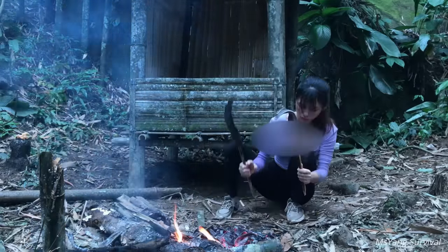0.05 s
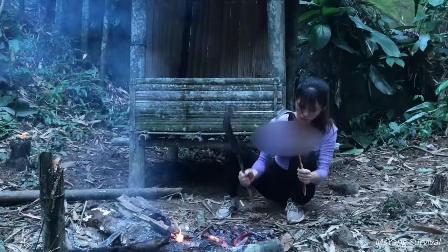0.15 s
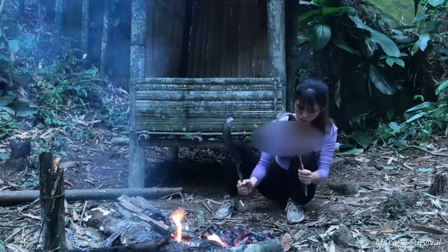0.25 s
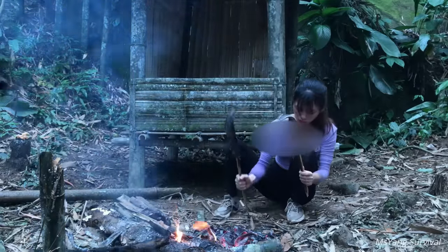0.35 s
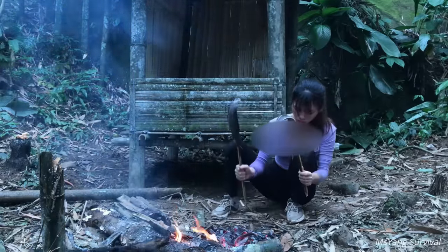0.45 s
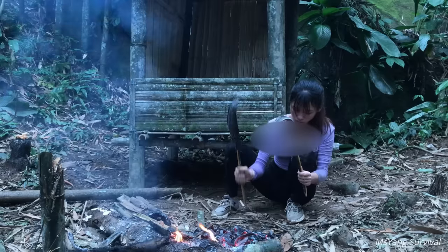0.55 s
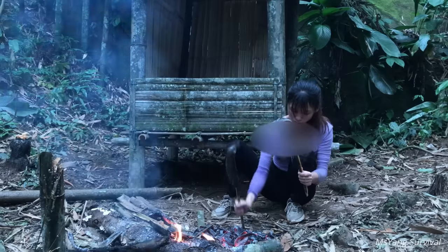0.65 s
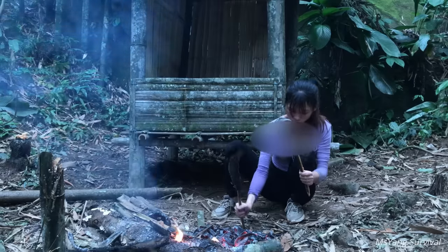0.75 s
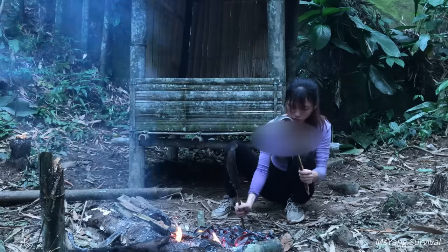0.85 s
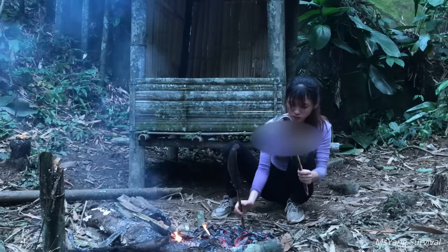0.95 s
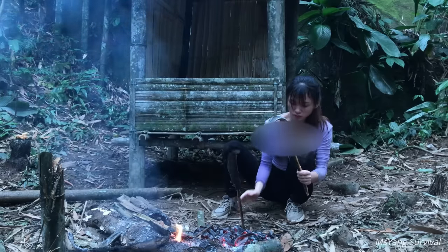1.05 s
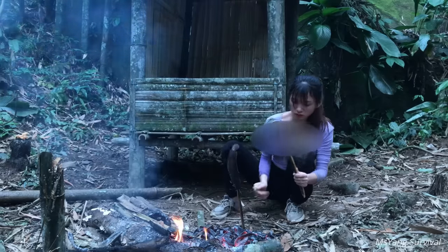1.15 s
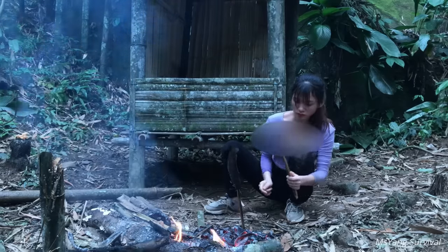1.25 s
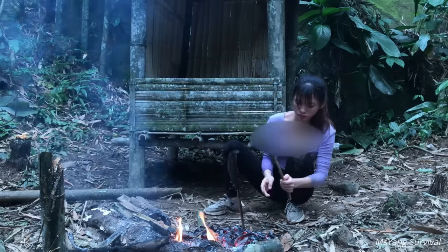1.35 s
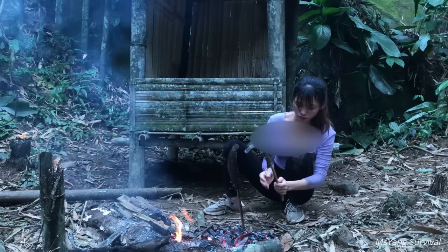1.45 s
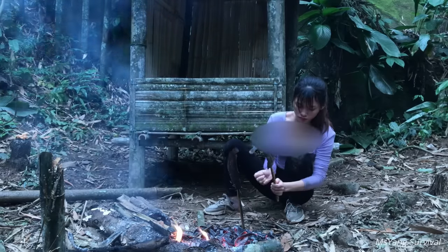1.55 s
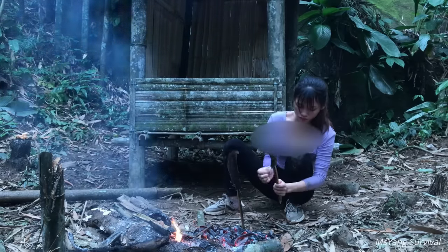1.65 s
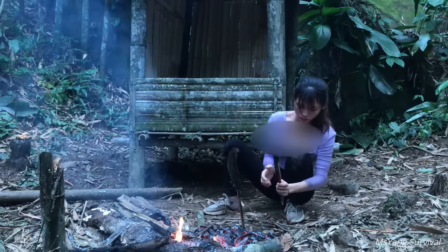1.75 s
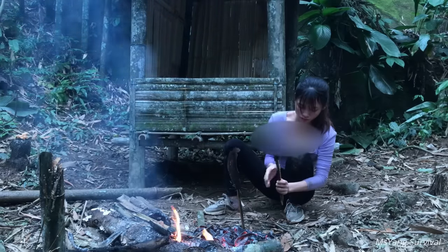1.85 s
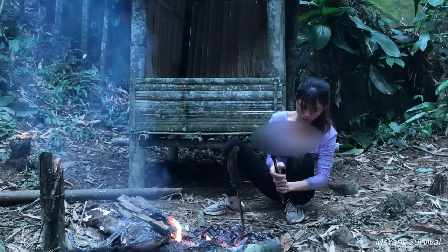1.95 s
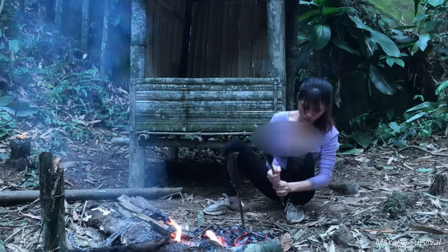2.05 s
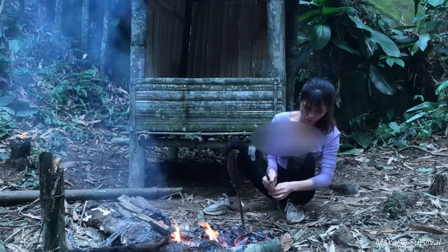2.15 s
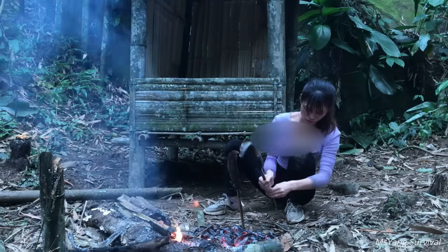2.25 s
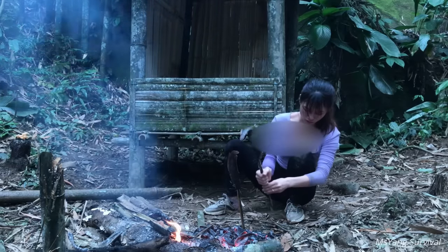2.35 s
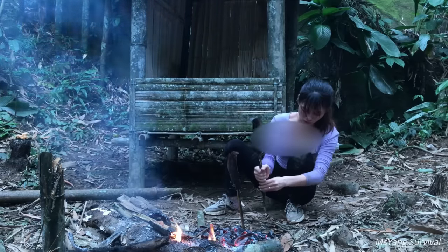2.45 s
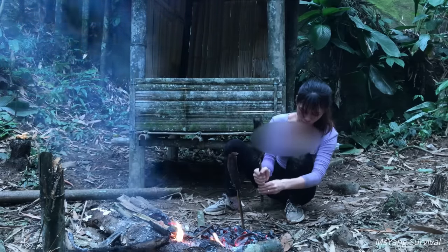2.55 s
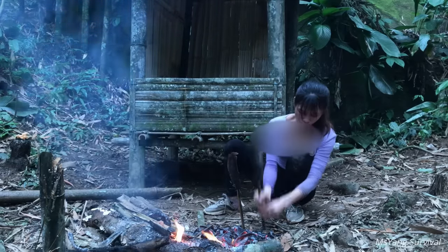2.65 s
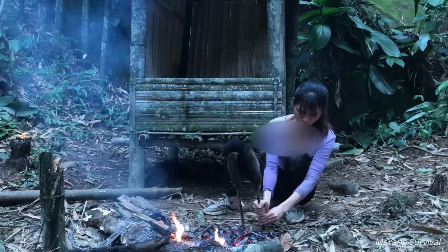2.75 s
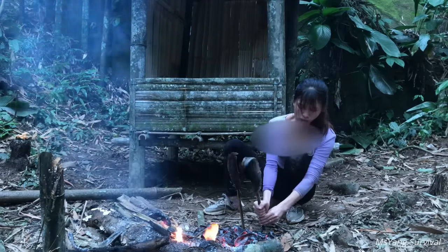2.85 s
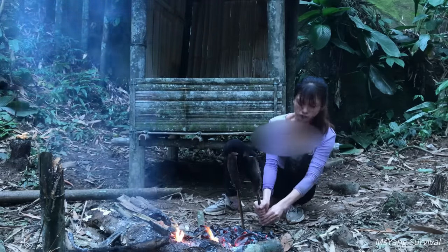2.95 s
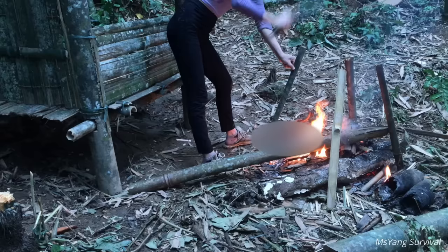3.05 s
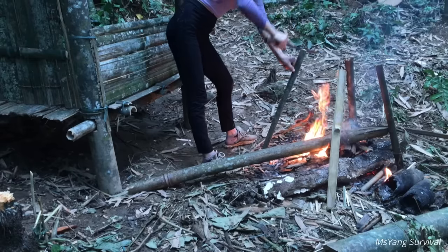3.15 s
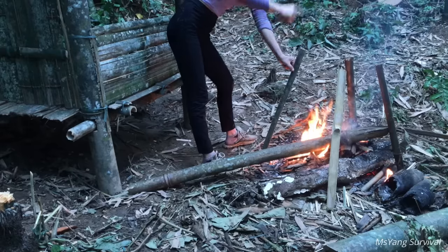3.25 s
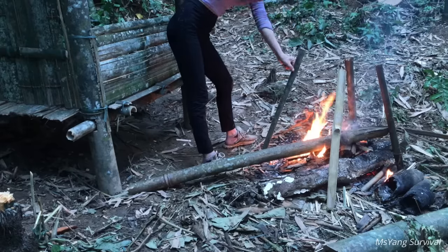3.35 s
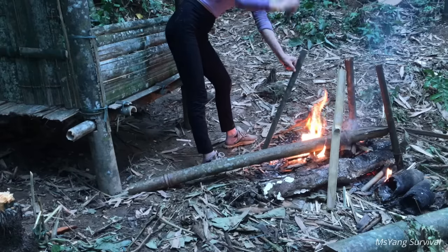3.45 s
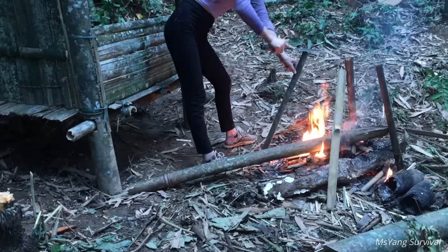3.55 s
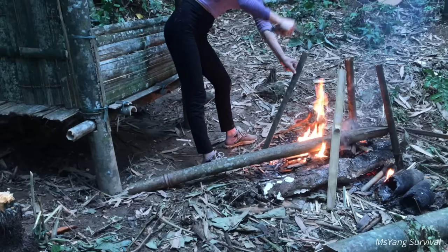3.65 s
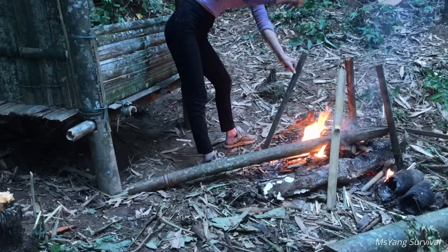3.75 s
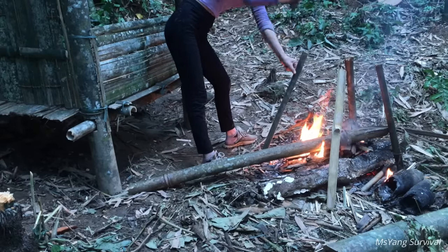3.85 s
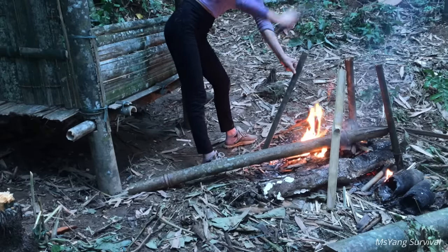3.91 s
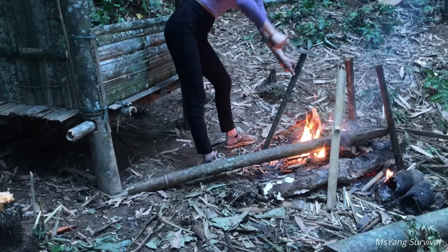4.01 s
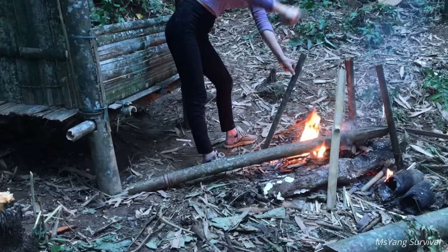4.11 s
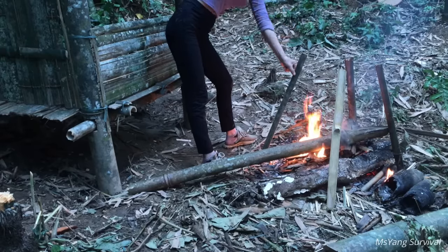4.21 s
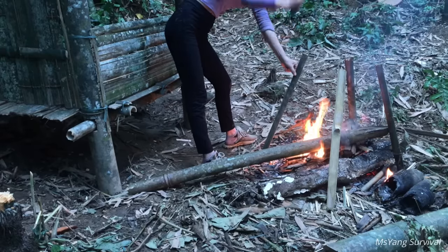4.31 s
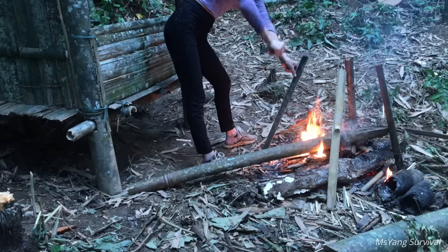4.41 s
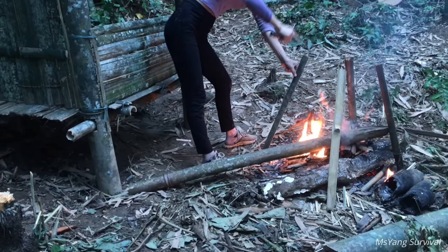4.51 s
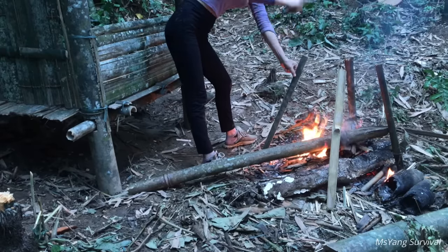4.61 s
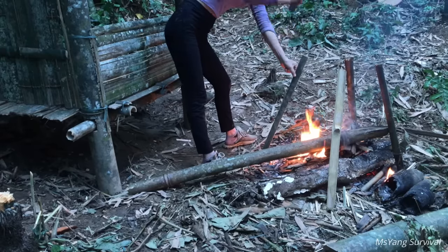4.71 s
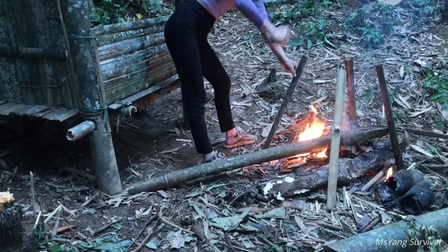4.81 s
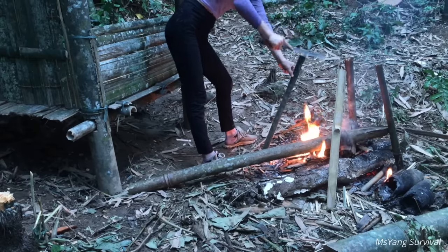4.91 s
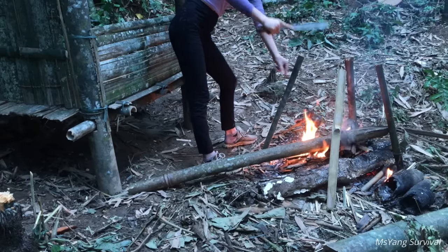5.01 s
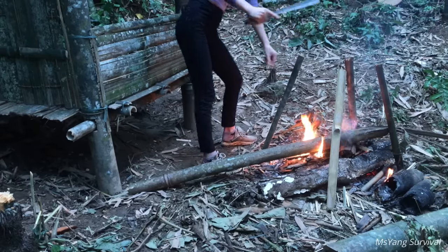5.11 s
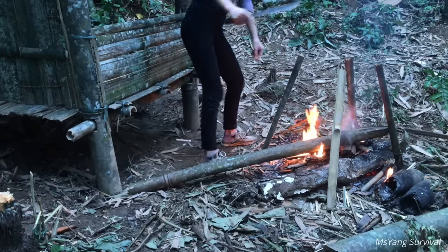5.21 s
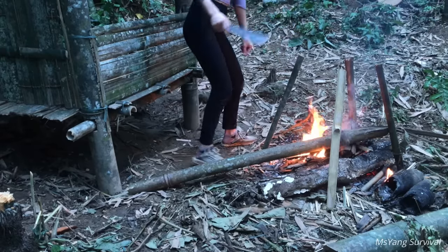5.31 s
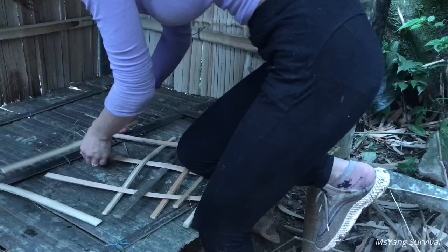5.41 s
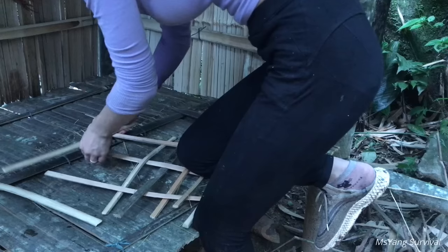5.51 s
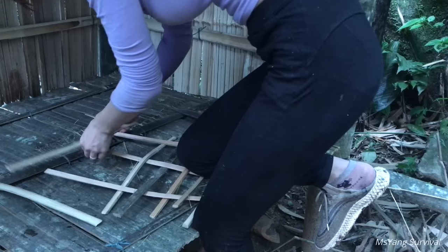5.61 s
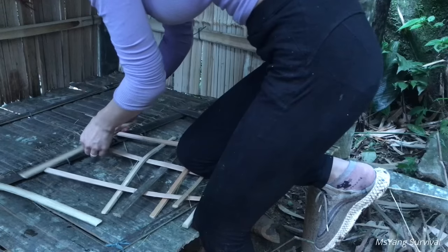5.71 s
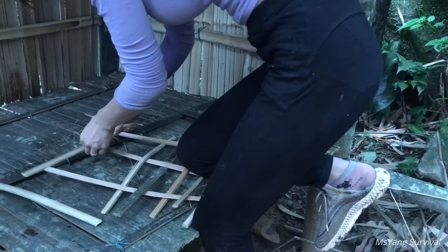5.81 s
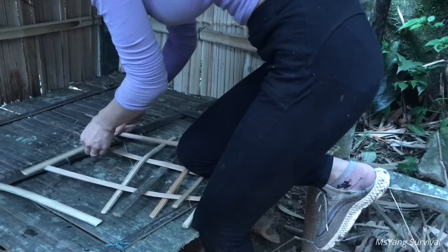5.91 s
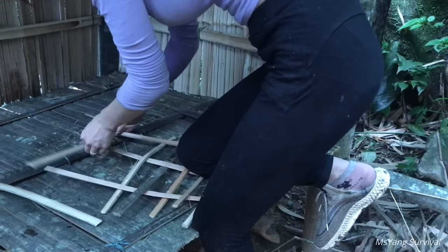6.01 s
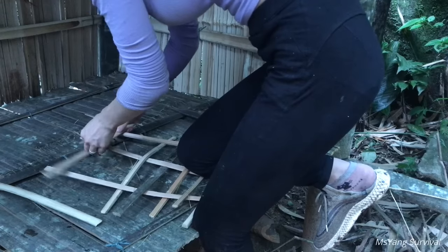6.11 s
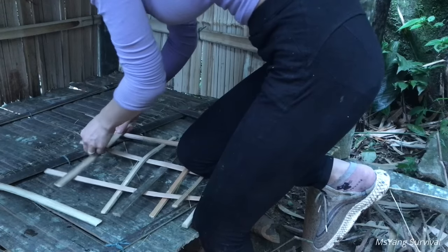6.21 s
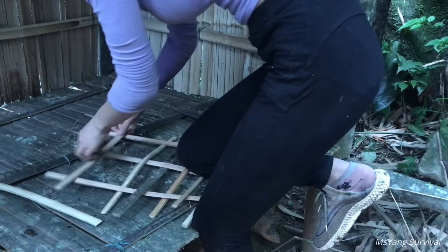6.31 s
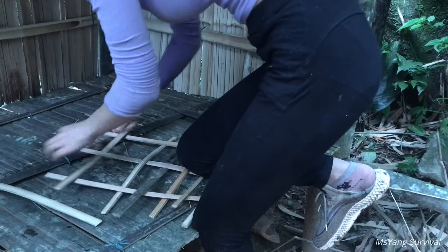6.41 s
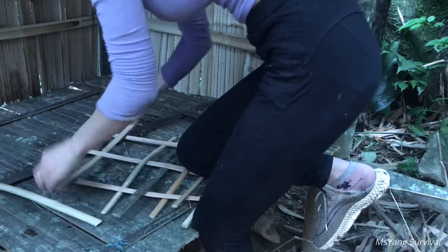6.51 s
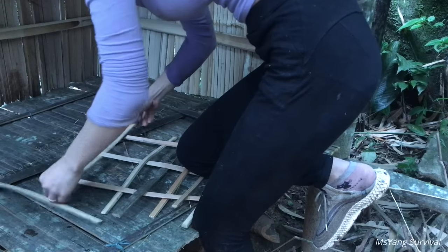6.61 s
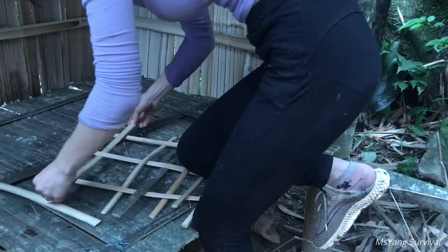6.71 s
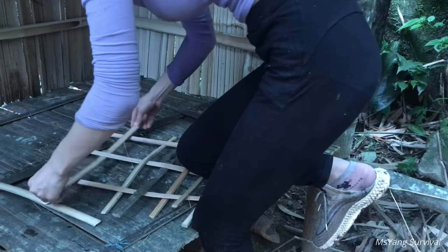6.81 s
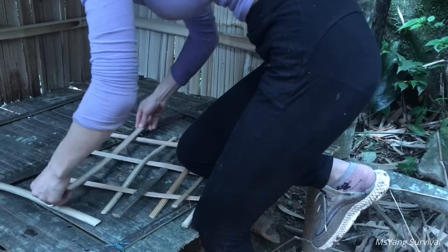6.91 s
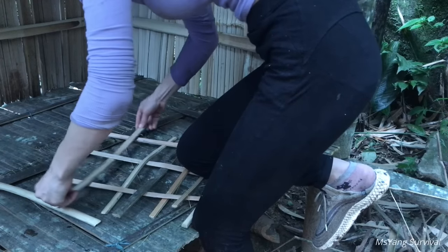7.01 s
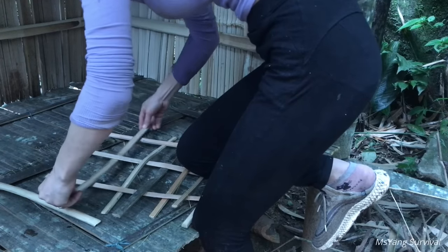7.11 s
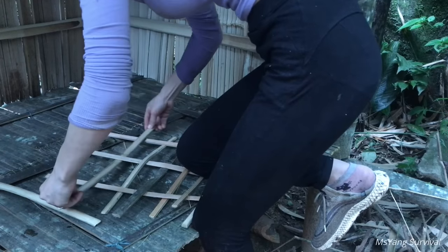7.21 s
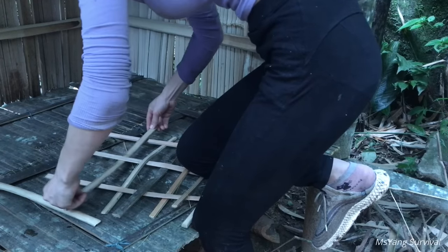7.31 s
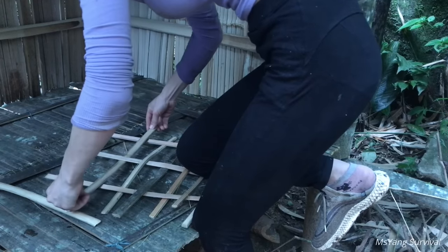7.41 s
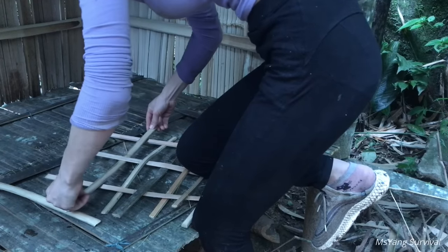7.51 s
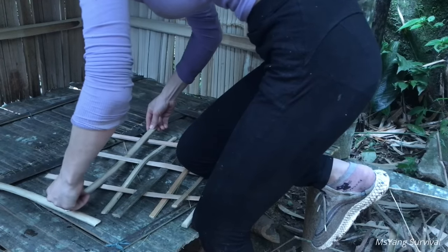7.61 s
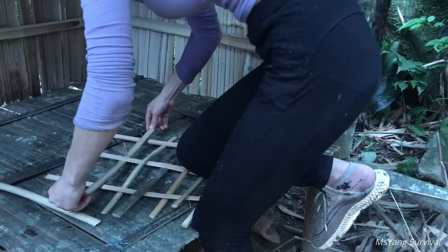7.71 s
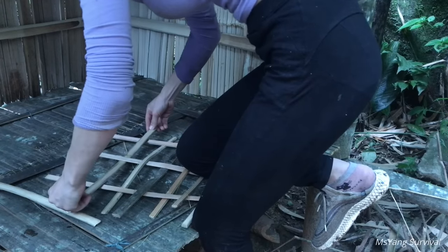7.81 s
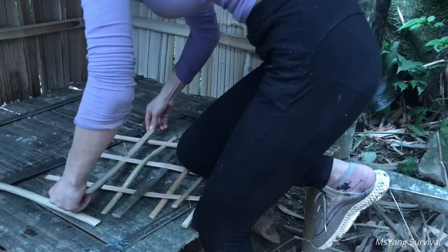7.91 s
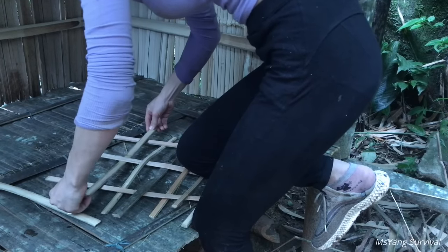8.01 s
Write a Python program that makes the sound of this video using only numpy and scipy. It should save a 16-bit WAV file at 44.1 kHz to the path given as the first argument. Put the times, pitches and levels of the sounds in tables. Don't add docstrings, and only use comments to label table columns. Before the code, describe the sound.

Quiet stream wash and sparse campfire ticks, then five sharp evenly spaced knocks of blade on wooden stake, then light clicks of sticks.

```python
import sys
import numpy as np
from scipy import signal
from scipy.io import wavfile
from scipy.ndimage import uniform_filter1d

SR = 44100
rng = np.random.default_rng(int(sys.argv[2]) if len(sys.argv) > 2 else 0)


def inscribe(sig):
    pcm = np.round(np.clip(np.atleast_2d(sig).T, -1, 1) * 32767)
    wavfile.write(sys.argv[1], SR, pcm.astype(np.int16))


def boost_factor(decibels):
    exponent = np.asarray(decibels, float) / 20
    return 10 ** exponent


N = 355394
NOISE_EDGE_HZ = 15780


def evened(x):
    return x / np.sqrt(np.mean(x ** 2) + 1e-20)


def read(points, hz):
    f, value = np.transpose(points)
    return np.interp(np.log(hz + 1), np.log(f + 1), value)


def add(mix, s, sound):
    part = mix[round(s * SR):][:len(sound)]
    part += sound[:len(part)]


def smooth(x, size, axis=-1):
    return uniform_filter1d(uniform_filter1d(x, size, axis), size, axis)


def highpass(x, order, hz):
    return signal.sosfilt(signal.butter(order, hz, "high", fs=SR, output="sos"), x)


def shaped(level_db, size, count):
    hz = np.fft.rfftfreq(size, 1 / SR)
    t = np.arange(4 * count // size + 5) * size / 4 / SR
    a, b = rng.standard_normal((len(t), len(hz), 2)).T
    z = (a + 1j * b) * boost_factor(level_db(hz[:, None], t))
    return signal.istft(z, nperseg=size, noverlap=3 * size // 4)[1][:count]


def dying(colour, t60s, tilt_db, t, size):
    def start_db(hz):
        tilt = tilt_db * np.log2(hz / 4000 + 0.004)
        return read(colour, hz) + tilt - 60 * (hz > NOISE_EDGE_HZ)

    start = boost_factor(start_db(np.fft.rfftfreq(size, 1 / SR)))
    norm = np.sqrt(np.mean(start ** 2) * size * 4 / 3)
    return shaped(lambda hz, s: start_db(hz) - 60 * s / read(t60s, hz), size, len(t)) / norm


def ringing(modes, t, spread_db, ragged):
    luck = rng.random((len(modes), 2))
    waver = smooth(rng.standard_normal((len(modes), 2, len(t))), 130)
    waver /= waver.std()
    total = np.zeros(len(t))
    for (hz, db, t60), (u, v), (a, b) in zip(modes, luck, waver):
        level = boost_factor(db + spread_db * (2 * u - 3) - 60 * t / t60)
        phase = 2 * np.pi * (hz * t + v)
        total += level * ((1 + ragged * a) * np.sin(phase) + ragged * b * np.cos(phase))
    return total


def favoured(modes, centre_hz, lift_db, octaves):
    return [(hz, db + lift_db * np.exp(-(np.log2(hz / centre_hz) / octaves) ** 2), t60)
            for hz, db, t60 in modes]


def resonant(noise, bands):
    return sum(lift * signal.lfilter(*signal.iirpeak(hz, hz / width, SR), noise)
               for hz, width, lift in bands)


# Hz, dB per Hz.
CRACK_COLOUR = [(88, -45), (150, -7.5), (621, -0.5), (852, -16), (1170, -14), (1880, -14.5), (3080, -8),
                (6770, -10), (7780, -14.5), (10900, -17), (14100, -24), (15800, -23), (16800, -52)]
# Hz, t60 in s.
CRACK_DECAY = [(300, 0.32), (1200, 0.13), (4000, 0.095), (8000, 0.073), (15000, 0.057)]


def steel_crack(t, rattle_ms, tilt_db, ring_bands):
    rattle_s = rattle_ms / 1000
    held = np.where(t < rattle_s, 1, 0.5 + 0.5 * np.exp(-(t - rattle_s) / 0.0058))
    bounce_db = -6.5 + 2.5 * (rattle_ms - 8.6)
    held = held + boost_factor(bounce_db) * np.exp(-((t - 0.8 * rattle_s) / 0.002) ** 2)
    held = held + 0.5 * np.exp(-t / 0.00049)
    crack = boost_factor(-2.5) * held * dying(CRACK_COLOUR, CRACK_DECAY, tilt_db, t, size=128)
    crack = highpass(crack, 5, 1000)
    return crack + 0.57 * resonant(crack, ring_bands)


# Hz, dB, t60 in s.
TOP_TONES = [(916, -5, 0.045), (1060, -9.5, 0.04), (1166, -0.5, .062)]
# Hz, dB, t60 in s.
FOOT_TONES = [(210, -0.5, 0.061), (281, -7.5, 0.094), (408, -3.5, 0.07), (491, -6, 0.067), (586, -5, 0.081)]
# Hz, dB, t60 in s.
LOOSE_TONE = (765, -18, 0.045)
# Hz, dB, t60 in s.
GRAIN_TONES = [(2210, -9.5, .09), (2436, -10, 0.082), (3075, -12.5, 0.09), (3475, -5, 0.043),
               (3790, -3.5, 0.084), (4060, -14.5, .11), (4335, -15, 0.15), (4710, -4.5, 0.066),
               (5380, -22, 0.2), (5960, -15, 0.14), (6250, -18, 0.11), (6600, -11, 0.13), (6860, -18, 0.15)]


def stake_ring(t, knock_db, stake_hz, shaft_hz, since_s):
    sink_per_s, firm_db_per_s, foot_db = 0.028, 12, -26.5
    knock = [(hz * (1 + sink_per_s * since_s), db + knock_db, t60) for hz, db, t60 in TOP_TONES]
    knock += [(hz, db + foot_db, t60) for hz, db, t60 in FOOT_TONES]
    knock += [(shaft_hz, -15, 0.054), np.subtract(LOOSE_TONE, (0, firm_db_per_s * since_s, 0))]
    wood = ringing(knock, t, spread_db=2, ragged=0.28) * (1 - np.exp(-t / 0.003))
    grain = favoured(GRAIN_TONES, stake_hz, lift_db=7.5, octaves=0.063)
    wood += boost_factor(-14) * ringing(grain, t, spread_db=2, ragged=0.8)
    hum = [(stake_hz, -37, 0.3)]
    return wood + ringing(hum, t, spread_db=0.5, ragged=0.68)


# Hz, dB, t60 in s.
BLADE_TONES = [(2060, -8, .22), (8270, -6, .18), (9455, -8, .22), (10740, 0, .09), (11955, -11, .22),
               (12250, -10, .12), (13600, -8, .12), (15410, -14, .14)]


def blade_ring(t, blade_hz):
    tones = favoured(BLADE_TONES, blade_hz, lift_db=8, octaves=0.04)
    return boost_factor(-31) * ringing(tones, t, spread_db=2, ragged=1.2)


def ground_thump(t):
    jolt = 0.5 * np.exp(-((t - 0.0052) / 0.0017) ** 2) * np.sin(2 * np.pi * 165 * (0.0052 - t))
    swell = np.exp(-((t - 0.0195) / 0.0092) ** 2) + 0.13 * np.exp(-((t - 0.045) / 0.02) ** 2)
    wave = -swell * np.cos(2 * np.pi * 84 * (t - 0.0198))
    roll = 0.065 * np.exp(-((t - 0.12) / 0.027) ** 2) * np.sin(2 * np.pi * 66 * t)
    return boost_factor(-33.5) * (jolt + wave + roll)


# Hz, dB per Hz.
ECHO_COLOUR = [(290, -62), (500, -39), (649, -21), (707, -51), (760, -30), (958, -19), (1030, 11.5),
               (1810, -5), (2090, -5), (2350, -8), (3890, -0.5), (12400, -11), (15800, -15)]
# Hz, t60 in s.
ECHO_DECAY = [(500, 0.067), (1200, 0.13), (2500, 0.62), (4000, 0.56), (6500, 0.65), (10000, 0.49),
              (15000, 0.33)]


def tree_echoes(t, echo_db, ring_bands):
    echoes = dying(ECHO_COLOUR, ECHO_DECAY, 0, t, size=256)
    echoes = echoes + resonant(echoes, ring_bands)
    return boost_factor(echo_db) * echoes * (1 - np.exp(-t / 0.002))


# delay in s, t60 in s.
SLOPE_ANSWER = (.205, .22)
# Hz, dB per Hz.
FAR_COLOUR = [(1200, -25), (2500, -3), (4000, 2), (6500, -2), (9000, -5), (15000, -18)]


def slope_answer(t, far_db):
    delay_s, t60 = SLOPE_ANSWER
    onset = 1 - np.exp(-np.maximum(t - delay_s, 0) / 0.014)
    answer = dying(FAR_COLOUR, [(100, t60), (16000, t60)], 0, t, size=256)
    return boost_factor(far_db) * onset * np.roll(answer, round(delay_s * SR))


# Hz, width in Hz, lift as a factor.
RING_BANDS = [(3750, 250, .7), (4650, 330, .5), (6600, 590, 0.51), (8300, 200, 0.45), (9450, 220, .8),
              (10750, 230, 1.1), (12200, 300, 1), (13650, 220, 1.3)]


def blow(db, rattle_ms, tilt_db, knock_db, stake_hz, blade_hz, shaft_hz, echo_db, far_db, since_s):
    t = np.arange(SR // 2) / SR
    bands = RING_BANDS + [(hz, 240, 0.95) for hz in (stake_hz, blade_hz)]
    air = steel_crack(t, rattle_ms, tilt_db, bands[-6:])
    air = air + tree_echoes(t, echo_db, bands) + slope_answer(t, far_db)
    air = air + stake_ring(t, knock_db, stake_hz, shaft_hz, since_s) + blade_ring(t, blade_hz)
    rise = 1 - np.exp(-(t / 0.00033) ** 2)
    return boost_factor(db) * rise * air + ground_thump(t)


# start in s, peak in dB, rattle in ms, brightness in dB an octave, wood knock in dB.
STRIKES = [
    (3.1492, -1, 6.8, 0.7, -28),
    (3.5893, -1, 7.2, 1.5, -22),
    (4.0211, -1, 7.6, 1.1, -8),
    (4.4723, 0, 9.8, 2.9, -13),
    (4.8988, -1.5, 4.9, 1.5, -14),
]
# stake tone in Hz, blade tone in Hz, shaft tone in Hz, echo in dB,
# far answer in dB.
LANDINGS = [(3620, 10700, 1550, -24.5, -40), (3050, 8000, 2000, -22, -34), (4660, 13000, 1700, -23, -45),
            (4250, 8200, 2070, -21.5, -32.5), (4520, 13000, 3400, -21.5, -34)]


def add_blows(mix):
    for (s, *strike), landing in zip(STRIKES, LANDINGS):
        add(mix, s, blow(*strike, *landing, since_s=s - STRIKES[0][0]))


# Hz, dB per Hz.
SNAP_COLOUR = [(500, -25), (1400, -4), (4000, -2.5), (12000, -6.5), (16500, -17)]


def tick(db, t60, tilt_db, tones):
    t = np.arange(SR // 6) / SR
    snap = dying(SNAP_COLOUR, [(100, t60), (16000, 2.3 * t60)], tilt_db, t, size=64)
    snap = highpass(snap, 2, 700)
    ring = ringing(tones, t, spread_db=1.5, ragged=0.59)
    return boost_factor(db) * (1 - np.exp(-t / 0.00051)) * (0.6 * snap + ring)


# start in s, peak in dB, ringing in Hz,
# ring in dB, t60 in s.
WOOD_TICKS = [(.028, -33.5, 6500, -24, .045), (.321, -40, 12000, -15, .012), (.38, -46, 8700, 0, .03),
              (.539, -41, 14500, -10, .012), (.636, -43, 11500, -8, .014), (.666, -28.5, 6500, -5, 0.033),
              (.675, -35, 6600, -2, .021), (.686, -37, 6500, -12, .036), (2.675, -40, 6040, -15, .071),
              (2.683, -34, 3200, -15, .073), (2.703, -44, 9000, -14, .06),
              (5.349, -35, 9000, -20, .018), (5.608, -33, 6500, -8, 0.017),
                (5.636, -44, 12000, -15, .015), (5.668, -38, 2480, -7, .04), (5.798, -39, 13000, -15, .012),
                (6.019, -31.5, 1370, -8.5, .083), (6.0216, -25, 8830, -5, 0.023),
                (6.030, -39, 8700, -7, .04), (6.382, -23, 5900, -9, 0.032), (6.692, -40, 14000, -15, .014),
                (6.755, -43, 11000, -12, .012), (7.292, -41, 14000, -15, .014),
                (7.358, -33, 8500, -8, .014)]
# start in s, peak in dB, t60 in s, brightness in dB an octave.
EMBER_SNAP = (.661, -22, .03, -5)
TWIG_SNAP = (6.3712, -13, .011, 2)
# Hz, dB, t60 in s.
EMBER_RING = [(800, -20.5, 0.036), (1470, -11, .03), (2230, -12, .03), (2600, -7.5, 0.023),
              (3430, -7.5, .028), (6200, -10, 0.023)]
TWIG_RING = [(1300, -24, .05), (2120, -16, 0.039), (4180, -11, 0.028), (5120, -16, .026),
             (5840, -17.5, 0.088), (8850, -12, .012)]


def add_ticks(mix):
    for s, db, hz, ring_db, t60 in WOOD_TICKS:
        tilt_db = 2.5 * np.log2(hz / 5500)
        add(mix, s, tick(db, t60, tilt_db, [(hz, ring_db, t60)]))
    for (s, *snap), tones in ((EMBER_SNAP, EMBER_RING), (TWIG_SNAP, TWIG_RING)):
        add(mix, s, tick(*snap, tones))


# Hz, dB per Hz.
SLIDE_COLOUR = [(1500, -6), (5000, 0), (9000, -5), (15500, -6), (15900, -40)]
# loudest at s, level in dB, rise in dB a second, fall in dB a second.
SLIDE = (6.86, -50.5, 140, 105)


def add_slide(mix):
    s, db, rise_db, fall_db = SLIDE
    t = np.arange(-SR // 4, SR // 4) / SR
    noise = evened(shaped(lambda hz, u: read(SLIDE_COLOUR, hz) + 0 * u, 256, len(t)))
    add(mix, s + t[0], noise * boost_factor(db + np.minimum(rise_db * t, -fall_db * t)))


def bubble(hz, turns):
    u = np.linspace(0, 1, int(turns * SR / hz))
    return np.sin(np.pi * u ** 0.6) ** 2 * np.sin(2 * np.pi * turns * (u + 0.022 * u * u))


# start in s, peak in dB, Hz.
SOIL_THUDS = [(0.656, -50.5, 111), (0.796, -54, 132), (1.261, -61, 121), (2.222, -63, 131),
              (5.56, -51, 78.1), (5.682, -47, 72), (6.597, -57, 91.5), (6.923, -55, 143),
              (7.063, -54, 70.0), (7.309, -47, 78.1), (7.515, -49, 148)]


def add_thuds(mix):
    for s, db, hz in SOIL_THUDS:
        add(mix, s, boost_factor(db) * bubble(hz, turns=4.6))


# start in s, peak in dB, Hz.
WATER_PLOPS = [(1.167, -55, 896), (1.856, -43.5, 1080), (2.227, -45, 730), (3.79, -62, 1050),
               (4.677, -56, 1190), (4.715, -45, 1100), (6.265, -45, 1000), (6.4205, -37, 980),
               (6.499, -46, 1520), (6.621, -43, 940), (7.204, -42.5, 1115), (8.004, -46, 996)]


def add_plops(mix):
    for s, db, hz in WATER_PLOPS:
        add(mix, s - 0.002, boost_factor(db) * bubble(hz, turns=15))


def gurgle(per_s, spread_db):
    size = boost_factor(spread_db * np.minimum(rng.exponential(1, N), 4))
    size = size * (rng.random(N) < per_s / SR)
    kind = rng.integers(0, 24, N)
    pitches_hz = np.geomspace(190, 1700, 24)
    return evened(sum(signal.oaconvolve(size * (kind == k), bubble(hz, turns=10.4))[:N]
                      for k, hz in enumerate(pitches_hz)))


# Hz, dB per Hz.
SPOT_COLOURS = [
    [(18, -55), (30, -34), (48, -2), (95, -5), (257, -2), (401, -9), (445, -6), (714, -5.5), (880, -4),
     (1830, -6.5), (2040, -6.5), (3350, -7.5), (8820, -15), (10300, -17.5), (15700, -17.5)],
    [(18, -37), (30, -10), (98, -3.5), (178, -16), (250, -14), (469, -18), (610, -11.5), (733, -18),
     (814, -10.5), (1170, -9), (1880, -13.5), (4580, -14.5), (15700, -27)],
    [(18, -42), (30, -10), (75, -1.5), (117, -6.5), (293, -7.5), (457, -13.5), (564, -9.5), (626, -7.5),
     (857, -11), (952, -6), (1450, -9.5), (1650, -11.5), (3920, -14.5), (10300, -24), (15700, -25.5)],
]
SPOT_LEVELS_DB = [-43, -43.5, -41.5]
# start in s, end in s.
SPOT_FADES = [
    (3.13, 3.15),
    (5.3, 5.56),
]


def water():
    def level_db(hz, t):
        second, third = (np.interp(t, fade, [0, 1]) for fade in SPOT_FADES)
        colours = []
        for points, db in zip(SPOT_COLOURS, SPOT_LEVELS_DB):
            colour = read(points, hz)
            colours.append(colour + db - 10 * np.log10(np.mean(boost_factor(colour) ** 2)))
        mixed = (1 - second) * colours[0] + (second - third) * colours[1] + third * colours[2]
        patches = rng.standard_normal((len(t), len(hz))).T
        patches = uniform_filter1d(uniform_filter1d(patches, 10, 0), 10, 1)
        lumps = evened(smooth(rng.standard_normal(len(t)), 14))
        lump_db = 0.5 + 4.4 / (1 + (hz / 130) ** 2)
        return mixed - 60 * (hz > NOISE_EDGE_HZ) + 0.94 * evened(patches) + lump_db * lumps

    wash = shaped(level_db, 1024, N) / np.sqrt(1024 * 4 / 3)
    gurgle_db = np.interp(np.arange(N) / SR, np.ravel(SPOT_FADES), [-65, -63, -62.5, -61])
    return wash + boost_factor(gurgle_db) * gurgle(per_s=150, spread_db=3)


def scene():
    mix = water()
    add_blows(mix)
    add_ticks(mix)
    add_slide(mix)
    add_thuds(mix)
    add_plops(mix)
    return mix[None]


def low_pass(x):
    return signal.sosfilt(signal.butter(12, 17030, fs=SR, output="sos"), x)


# Hz, width in Hz, dB.
HOUSING_DIPS = [(4900, 190, -3), (7770, 220, -4.5), (10380, 310, -5.5), (13000, 300, 0)]


def record(dry):
    hz = np.linspace(0, SR / 2, 257)
    dips_db = sum(db * np.exp(-((hz - f) / width) ** 2) for f, width, db in HOUSING_DIPS)
    housing = signal.firwin2(201, hz, boost_factor(dips_db), fs=SR)
    heard = signal.oaconvolve(dry, housing[None], "same")
    held = highpass(1.3 * np.tanh(heard / 1.3), 3, 43)
    band = signal.firwin(127, 16300, window=("kaiser", 8), fs=SR)
    return low_pass(signal.oaconvolve(held, band[None], "same"))


dry = scene()
out = record(dry)
inscribe(out)
```